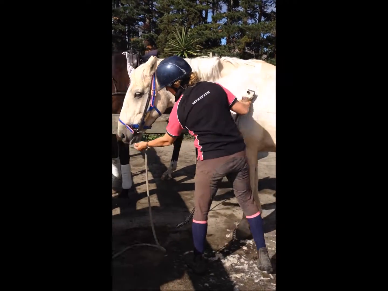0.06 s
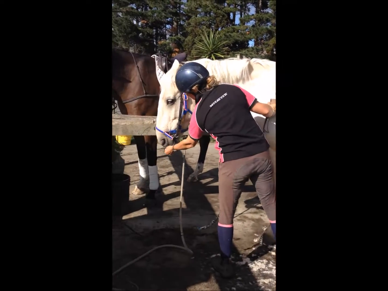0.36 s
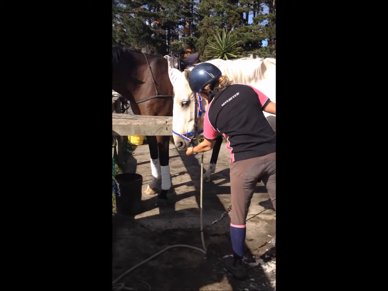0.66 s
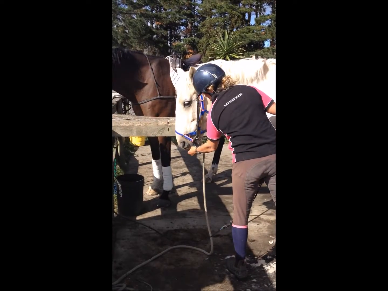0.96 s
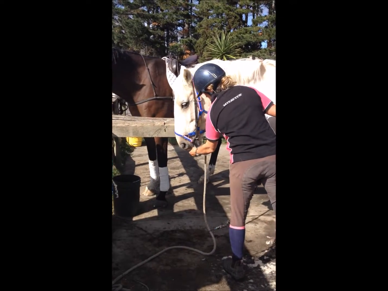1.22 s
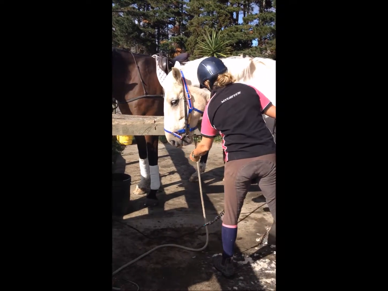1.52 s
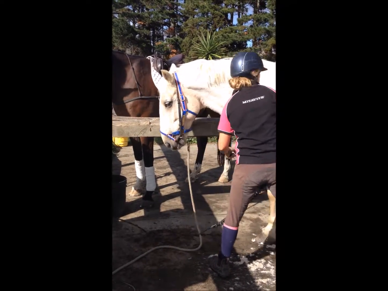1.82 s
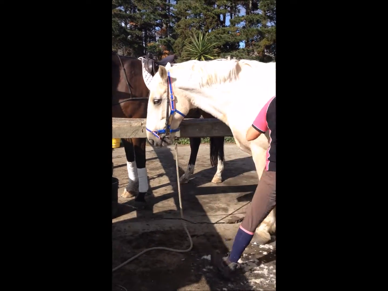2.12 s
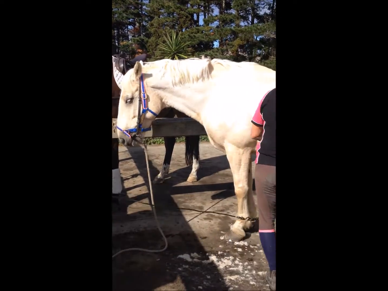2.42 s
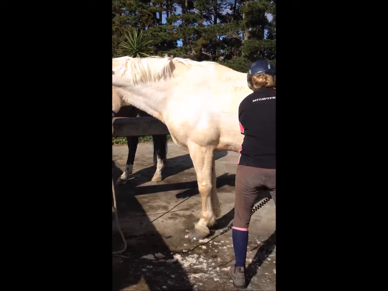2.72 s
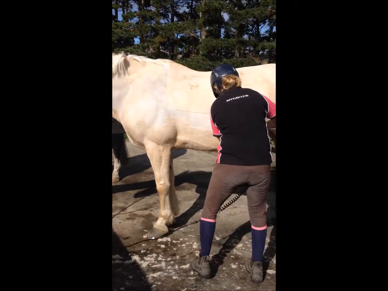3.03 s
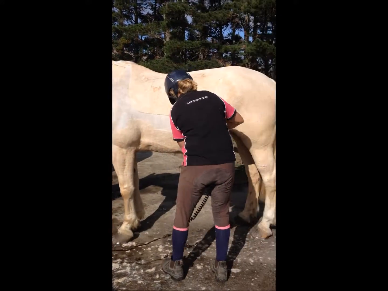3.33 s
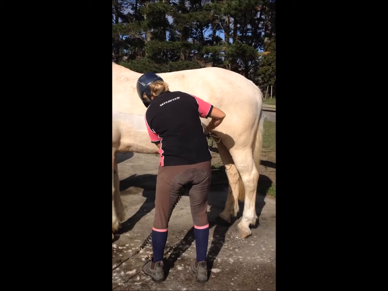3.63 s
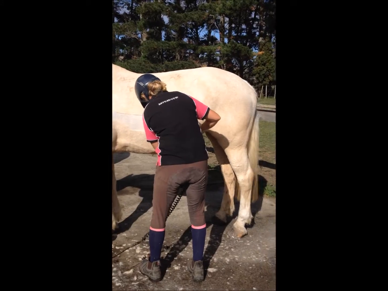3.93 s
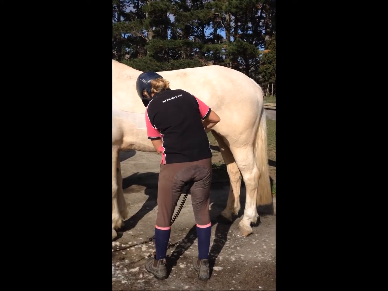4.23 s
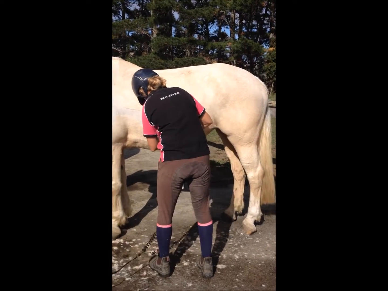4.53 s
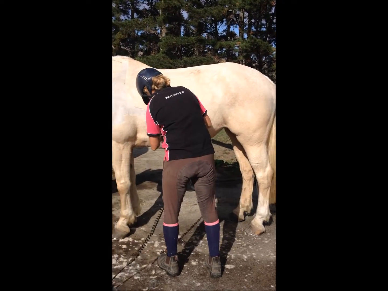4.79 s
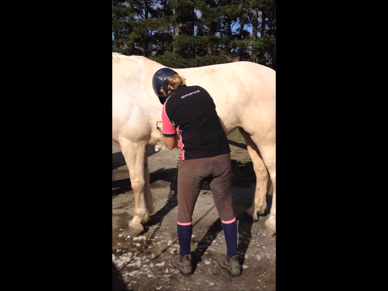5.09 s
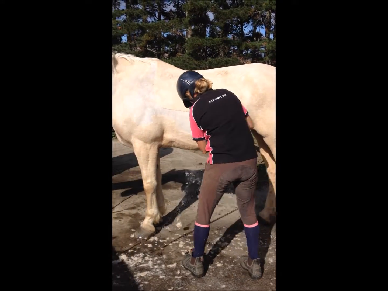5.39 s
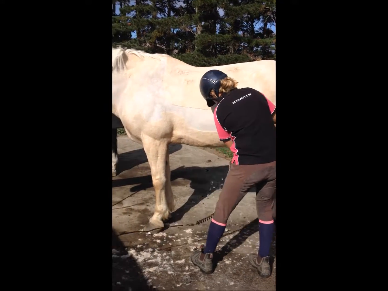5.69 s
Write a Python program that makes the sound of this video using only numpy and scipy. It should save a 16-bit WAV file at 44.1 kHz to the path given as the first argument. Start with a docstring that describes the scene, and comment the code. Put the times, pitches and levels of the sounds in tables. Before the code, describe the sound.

Electric clippers run throughout, a few steps from the microphone in an open yard, with a fast rattling buzz and low hum. Early on the blade rasps through a horse's coat and catches with small clicks. After two seconds the buzz turns quieter and duller, and feet and hooves thud softly. Near the end the motor sags slightly in pitch, then recovers with brief rasping surges. Faint outdoor air lies underneath.

```python
"""Electric horse clippers buzz in an open yard: a crank throws the blade to and fro, clacking at each end.
Held clear beside the horse's neck, they then move behind the groom to the belly, where the coat slows
the motor. Each stroke through the coat brings up the blade and the rasp of its teeth, with snags, and
surges in thick tufts; now and then the ringing of the gear or case swells briefly.
Feet and hooves thud softly over a low bed of outdoor air."""
import sys
import numpy as np
from scipy import signal
from scipy.fft import rfft, irfft, next_fast_len
from scipy.io import wavfile
from scipy.ndimage import uniform_filter1d, map_coordinates

SR = 44100
rng = np.random.default_rng(int(sys.argv[2]) if len(sys.argv) > 2 else 0)


def put_to_file(sound):
    """Save the sound as 16-bit audio at rate SR, in the file named by the first command-line argument."""
    columns = np.atleast_2d(sound).T  # one column per channel
    safe = np.clip(columns, -1, 1)
    whole_steps = np.round(safe * 32767)
    wavfile.write(sys.argv[1], SR, whole_steps.astype(np.int16))


N = 253575


def amp(db):
    """Decibels to gain."""
    return 10 ** (np.asarray(db) / 20)


def steady(x):
    """Ride the gain to hold rms 1 over about every fifth of a second."""
    power = uniform_filter1d(uniform_filter1d(x * x, size=SR // 8), size=SR // 8)
    return x / np.sqrt(np.abs(power) + 1e-20)


def automation(points):
    """Straight ramps through (t/s, value) points, one value per sample."""
    return np.interp(np.arange(N) / SR, *np.transpose(points))


def held(start, end, fade_s):
    """A gate open from start to end, each fade centred on its edge."""
    t = np.arange(N) / SR
    return np.clip(np.minimum(t - start, end - t) / fade_s + .5, 0, 1)


def wobble(per_s, count=4000):
    """Smooth random modulation with per_s knots a second."""
    knots = rng.standard_normal(int(N * per_s / SR) + 4)
    at = np.linspace(0, N, count)
    return np.interp(np.arange(N), at, map_coordinates(knots, [at * per_s / SR]))


def eq(x, points):
    """Minimum-phase EQ through (f/Hz, level/dB) points."""
    size = 2 * next_fast_len(N // 2 + 8192)
    hz, db = np.transpose(points)
    gain = amp(np.interp(np.log(np.fft.rfftfreq(size, 1 / SR) + 1), np.log(hz), db))
    cepstrum = irfft(np.log(np.maximum(gain, 1e-6)))
    cepstrum[1:size // 2] *= 2  # folding the cepstrum makes the filter causal
    cepstrum[size // 2 + 1:] = 0
    return irfft(rfft(x, size) * np.exp(rfft(cepstrum)), size)[:N]


def resonate(x, hz, width_hz):
    """A resonant band whose centre may sweep, levelled to rms 1."""
    carrier = np.exp(2j * np.pi * np.cumsum(hz) / SR)
    narrow = signal.butter(2, width_hz / 2, fs=SR, output="sos")
    return steady((signal.sosfilt(narrow, x / carrier) * carrier).real)


def impulses(times, sizes):
    """Clicks at times that may fall between samples."""
    at = np.clip(times * SR, 0, N)
    whole, part = at.astype(int), at % 1
    before = np.bincount(whole, sizes * (1 - part), N + 2)
    after = np.bincount(whole + 1, sizes * part, N + 2)
    return (before + after)[:N]


# Crank speed: t/s, speed/(turns per s)
CRANK_SPEED = [(0.0, 35.49), (0.7, 35.53), (1.7, 35.42), (2.1, 35.62), (2.35, 35.28), (2.6, 35.68),
               (2.85, 35.29), (3.1, 35.48), (3.4, 35.23), (3.65, 35.22), (3.9, 35.36), (4.1, 34.44),
               (4.35, 33.99), (4.6, 33.51), (4.85, 33.45), (5.1, 34.76), (5.35, 35.11), (5.75, 35.49)]
def load(free_hz=35.4, loaded_hz=33.5):
    """How hard the coat drags on the motor, 0-1, read from the sag in speed."""
    return np.clip((free_hz - automation(CRANK_SPEED)) / (free_hz - loaded_hz), 0, 1)


def crank(flutter_turns=.001, load_flutter_turns=.002):
    """The crank's running count of turns; it flutters, more so under load."""
    flutter = (flutter_turns + load_flutter_turns * load()) * wobble(per_s=9)
    return np.cumsum(automation(CRANK_SPEED)) / SR + flutter


def contacts(turns, jitter_s, scatter_db, rebound_db, back_db=-3, lag_turns=.118, first_turn=.245):
    """Forward and back click trains: the blade hits its stop and rebounds, softer on the way back."""
    stops = np.arange(int(2 * turns[-1]) - 1) / 2 + first_turn
    chance = rng.standard_normal((len(stops), 4))
    t = np.arange(N) / SR
    hit_s = np.interp(stops, turns, t) + jitter_s * chance[:, 0]
    rebound_s = np.interp(stops + lag_turns, turns, t) + 2 * jitter_s * chance[:, 1]
    hit_gain = amp(scatter_db * chance[:, 2])
    rebound_gain = np.sqrt(hit_gain) * amp(rebound_db + scatter_db * chance[:, 3])
    return [impulses(hit_s[side::2], hit_gain[side::2])
            + amp(side * back_db) * impulses(rebound_s[side::2], rebound_gain[side::2])
            for side in (0, 1)]


def decay(t60, yard_db, attack_s, yard_t60=0.25):
    """Envelope of one hit: the part's own ring, then a weak tail off horse, ground and rails."""
    t = np.arange(SR // 10) / SR
    attack = 1 - np.exp(-(t / attack_s) ** 2)
    return attack * np.hypot(amp(-60 * t / t60), amp(yard_db - 60 * t / yard_t60))


def buzz(sides, envelope, timbres=15):
    """Each direction rings alike turn after turn, crossfading to new timbres as the hand moves."""
    out = np.zeros(N + len(envelope))
    place = np.linspace(0, timbres - 1, N)
    for k in range(timbres):
        start, end = np.searchsorted(place, [k - 1, k + 1])
        crossfade = np.sqrt(np.clip(1 - np.abs(place[start:end] - k), 0, 1))
        for hits in sides:
            response = envelope * rng.standard_normal(len(envelope))
            rung = signal.fftconvolve(hits[start:end] * crossfade, response)
            out[start:start + len(rung)] += rung
    return steady(out[:N])


def rasp(sides, envelope):
    """Every hit triggers a fresh burst of noise."""
    power = signal.oaconvolve(sum(sides) ** 2, envelope ** 2)[:N]
    return steady(np.sqrt(np.abs(power)) * rng.standard_normal(N))


def rattle(sides, envelope, rasp_db):
    """Pitched buzz layered with noisy rasp from the same hits."""
    return buzz(sides, envelope) + amp(rasp_db) * rasp(sides, envelope)


# How much of the sound comes from behind the groom: t/s, share/0-1
HIDDEN_SHARE = [(0, 0.14), (1.7, 0.12), (1.92, 0.56), (2.6, 0.36), (3.0, 0.82), (5.75, 0.58)]
def perspective(clear, hidden):
    """Equal-power crossfade between the clippers held clear and hidden behind the groom."""
    share = automation(HIDDEN_SHARE)
    return steady(np.sqrt(1 - share) * steady(clear) + np.sqrt(share) * steady(hidden))


# Resonances held clear, behind the groom and under load: f/Hz, width/Hz, level/dB re the clatter
RINGS_CLEAR = [(1648, 138, -3.5), (2093, 200, -8.5), (2307, 50, -12), (4440, 420, -11.5), (5210, 86, -16),
               (5740, 86, -15.5)]
RINGS_HIDDEN = [(733, 174, -5.5), (1910, 80, -3.5), (2695, 80, -4.5), (6160, 125, -14)]
RINGS_LOADED = [(600, 16, -12), (820, 110, -25), (3010, 160, -11), (3880, 430, -9)]
# Brief swells of ringing in the gear or case: start/s, end/s, strength/0-1, f/Hz
RING_SWELLS = [(-.1, 0.08, 0.57, 2080), (0.53, 0.996, 0.19, 2100), (1.375, 1.46, 0.4, 1780),
               (1.76, 2.1, 0.27, 927), (1.852, 2.446, 0.27, 1040), (2, 2.367, 0.38, 1820),
               (2.784, 3.396, 0.83, 1858)]
# Strokes through the coat: start/s, end/s, pressure/0-1, case f/Hz, blade f/Hz
COAT_STROKES = [(0.162, 1.03, 0.11, 2380, 4360), (1.0, 1.742, 0.14, 2550, 4340),
                (2.31, 2.787, 0.32, 2870, 4670), (4.214, 4.938, 0.24, 2600, 4000),
                (4.923, 5.547, 0.13, 2700, 4000)]
# Thick tufts that make the blade surge: start/s, end/s, strength/0-1, f/Hz
TUFTS = [(4.907, 4.99, 0.5, 4100), (5.012, 5.104, 0.6, 4200), (5.17, 5.44, 0.21, 3800),
         (5.305, 5.35, 0.76, 4130)]
# The steel sings one note: start/s, end/s, level/dB re the clatter, first f/Hz, last f/Hz, width/Hz
WHINES = [(-.1, .34, -6, 1705, 1705, 45), (.28, .52, -5, 2335, 2325, 55), (.7, 1.02, -9, 2330, 2335, 60),
          (1.2, 1.52, -7.5, 1680, 1770, 60), (4.38, 4.98, -1, 4480, 4570, 125)]
SWELL_FADE_S, PRESS_FADE_S, TUFT_FADE_S = 0.1, 0.26, 0.012
def ringing(strikes, low_hz, high_hz, swell_db=8, bite_db=10.5, tuft_db=7, bite_delay_s=0.19):
    """One part's resonances, low_hz to high_hz, brought up by position, load, coat and brief swells."""
    hidden = automation(HIDDEN_SHARE)
    states = [(RINGS_CLEAR, 1 - hidden), (RINGS_HIDDEN, hidden), (RINGS_LOADED, load())]
    modes = [(hz, width, amp(db) * share) for table, share in states for hz, width, db in table]
    swell_width_hz, bite_width_hz, tuft_width_hz = 160, 270, 420
    for start, end, strength, hz in RING_SWELLS:
        modes.append((hz, swell_width_hz, amp(swell_db) * strength * held(start, end, SWELL_FADE_S)))
    for start, end, pressure, *pitches in COAT_STROKES:
        bite = amp(bite_db) * pressure * held(start + bite_delay_s, end, PRESS_FADE_S)
        modes += [(hz, bite_width_hz, bite) for hz in pitches]
    for start, end, strength, hz in TUFTS:
        modes.append((hz, tuft_width_hz, amp(tuft_db) * strength * held(start, end, TUFT_FADE_S)))
    tuning = 1 + .009 * wobble(per_s=7)  # the moving hand detunes the modes
    out = np.zeros(N)
    for start, end, db, first_hz, last_hz, width in WHINES:
        if low_hz <= first_hz < high_hz:
            glide = automation([(start, first_hz), (end, last_hz)])
            out += amp(db) * held(start, end, SWELL_FADE_S) * resonate(strikes, glide, width)
    for hz, width, gain in modes:
        if low_hz <= hz < high_hz:
            out += gain * resonate(strikes, hz * tuning, width)
    return out


# Swings of the clatter as the clippers move, used about their mean: t/s, level/dB
CLATTER_SWINGS = [(0, -30.5), (.25, -30.5), (.65, -28.5), (1.55, -29), (1.87, -34), (2.13, -32),
                  (3.35, -34), (3.6, -36), (4.3, -35.5), (4.85, -33.5), (5.3, -30.5), (5.75, -36)]
def fader(base_db, follows, stroke_db, swell_db, load_db):
    """One part's level in dB: it follows the swings and shifts with pressure, ring swells and load."""
    level = automation(CLATTER_SWINGS)
    pressure, swell = effort(COAT_STROKES, PRESS_FADE_S), effort(RING_SWELLS, SWELL_FADE_S)
    shift_db = stroke_db * pressure + swell_db * swell + load_db * load()
    return base_db + follows * (level - level.mean()) + shift_db


def effort(events, fade_s):
    """Control curve: the summed strength of one kind of event."""
    return sum(strength * held(start, end, fade_s) for start, end, strength, *_ in events)


# Tone of the gear, held clear and behind the groom: f/Hz, level/dB
GEAR_EQ_CLEAR = [(100, -42.5), (170, -11.5), (280, -11.5), (350, -7), (460, -13), (650, -12.5), (810, -9),
                 (950, -11.5), (1100, -3), (1250, -9), (1400, 3.5), (1800, -42)]
GEAR_EQ_HIDDEN = [(120, -37.5), (220, -28), (265, -14), (350, -4), (430, -3.5), (510, -17.5), (610, 1.5),
                  (700, 2), (790, 7), (920, -14.5), (1030, 4), (1200, -5), (1400, 3.5), (1800, -23.5)]
def gear(turns):
    """Low mids: the crank takes up its play with regular knocks, which roughen under load."""
    sides = contacts(turns, jitter_s=.00003, scatter_db=.8, rebound_db=-7)
    knocks = rattle(sides, decay(t60=.016, yard_db=-14, attack_s=.0012), rasp_db=-5.5 + load())
    strikes = rattle(sides, decay(t60=.004, yard_db=-14.5, attack_s=.0004), rasp_db=-3)
    rings = ringing(strikes, low_hz=200, high_hz=1350)
    return steady(perspective(eq(knocks, GEAR_EQ_CLEAR), eq(knocks, GEAR_EQ_HIDDEN)) + rings)


# Tone of the case, held clear and behind the groom: f/Hz, level/dB
CASE_EQ_CLEAR = [(900, -43), (1350, 1), (1550, -18), (2000, 5), (2350, 0.5), (2520, -10.5), (2750, 2),
                 (3150, -14), (4200, -42.5)]
CASE_EQ_HIDDEN = [(900, -57.5), (1300, -12.5), (1480, 5), (1950, 4.5), (2200, -10.5), (2400, 5),
                  (2750, 0.5), (3250, -10.5), (4200, -58.5)]
def case(turns):
    """Mids: the case rings briefly after each hit, wetter with echoes behind the groom."""
    sides = contacts(turns, jitter_s=.00004, scatter_db=.9, rebound_db=0, back_db=-1)
    clear = rattle(sides, decay(t60=.021, yard_db=-19, attack_s=.0014), rasp_db=-3)
    hidden = rattle(sides, decay(t60=.025, yard_db=-13, attack_s=.001), rasp_db=-1.5)
    strikes = rattle(sides, decay(t60=.005, yard_db=-27, attack_s=.0005), rasp_db=-2)
    rings = ringing(strikes, low_hz=1350, high_hz=3200)
    return steady(perspective(eq(clear, CASE_EQ_CLEAR), eq(hidden, CASE_EQ_HIDDEN)) + rings)


# Tone of the blade, held clear and behind the groom: f/Hz, level/dB
BLADE_EQ_CLEAR = [(300, -50), (2200, -15.5), (3150, -10.5), (3600, -2), (4300, -1), (4800, -3.5),
                  (5300, -7.5), (5800, -7), (6200, -43), (8000, -29)]
BLADE_EQ_HIDDEN = [(2200, -37.5), (3100, 5), (3500, 1), (3950, 4), (4500, 2.5), (4950, 3.5), (5700, -0.5),
                   (6200, -29), (8000, -38)]
def blade(turns):
    """Presence: sharp steel clacks, blurred by echoes behind the groom."""
    sides = contacts(turns, jitter_s=.00004, scatter_db=1.5, rebound_db=-2.5)
    sharp = decay(t60=.0052, yard_db=-25, attack_s=.0004)
    blurred = decay(t60=.014, yard_db=-14, attack_s=.001)
    clear = eq(rattle(sides, sharp, rasp_db=-0.5), BLADE_EQ_CLEAR)
    hidden = eq(rattle(sides, blurred, rasp_db=-0.5), BLADE_EQ_HIDDEN)
    rings = ringing(rattle(sides, sharp, rasp_db=-5), low_hz=3200, high_hz=8000)
    return steady(perspective(clear, hidden) + rings)


# Tone of the teeth: f/Hz, level/dB
TEETH_EQ = [(4800, -65), (6000, 3.5), (7200, 0), (8300, -7.5), (9400, -16.5), (12000, -24.5), (15500, -42)]
def teeth(turns):
    """Top end: the teeth rasp, meeting more hair on some throws than on others."""
    bites = contacts(turns, jitter_s=.0001, scatter_db=1.7, rebound_db=-2)
    clear = rasp(bites, decay(t60=.0052, yard_db=-25, attack_s=.0004))
    hidden = rasp(bites, decay(t60=.02, yard_db=-10, attack_s=.0013))
    return steady(eq(perspective(clear, hidden), TEETH_EQ))


def tones(turns, orders, waver_db=0.35):
    """Harmonics locked to the crank, each wavering slightly in level."""
    out = np.zeros(N)
    for order, db in orders:
        gain = np.sqrt(2) * amp(db - waver_db * wobble(per_s=3.82))
        out += gain * np.sin(2 * np.pi * (order * turns + rng.random()))
    return out


# Hum of the body, strongest while held clear: t/s, level/dB
HUM_FADER = [(0, -53.5), (1.5, -53.5), (1.77, -56), (1.88, -66), (3.3, -68), (5.0, -72), (5.75, -68)]
# Rough rumble under the hum: f/Hz, level/dB
RUMBLE_EQ = [(60, -30), (110, -15), (160, -4), (220, -14), (285, 3.5), (335, 2.5), (400, -14), (520, -34)]
# Partials of the hum, of what carries round the groom, and of the groan: f/crank speed, level/dB
HUM_PARTIALS = [(10, 0), (11, -11), (18, -12), (19, -13), (23, -6), (25, -11), (30, -3.5), (32, 1.5),
                (33, -4), (34, -7), (47, -1), (48, 2.5), (59, 2.5), (65, 0)]
HIDDEN_PARTIALS = [(10, -68), (18, -63), (19, -63), (22, -64), (30, -59), (31, -58)]
GROAN_PARTIALS = [(8, -61), (9, -65), (12, -66), (18, -57), (19, -61), (23, -62), (24, -60), (29, -62),
                  (30, -64), (32, -62), (34, -59)]
def hum(turns, rumble_db=-4):
    """The body hums over a rough rumble; load brings out a groan that sags with the speed."""
    rumble = amp(rumble_db) * steady(eq(rng.standard_normal(N), RUMBLE_EQ))
    clear = amp(automation(HUM_FADER)) * (tones(turns, HUM_PARTIALS) + rumble)
    hidden = automation(HIDDEN_SHARE) * (1 - load()) * tones(turns, HIDDEN_PARTIALS)
    groan = np.sqrt(load()) * tones(turns, GROAN_PARTIALS)
    return clear + hidden + groan


# Tone of the open yard: f/Hz, level/dB
AIR_EQ = [(20, -4), (45, -13), (75, -5), (140, 0.5), (280, -2.5), (500, -7), (2000, -6), (15000, -32)]
def air(level_db=-56.0, swell_db=.8):
    """A low, nearly steady bed of outdoor air."""
    return amp(level_db + swell_db * wobble(per_s=5)) * steady(eq(rng.standard_normal(N), AIR_EQ))


# Catches of the blade: t/s, level/dB before trim
SNAGS = [(0.3592, -19), (0.5428, -18), (0.6556, -22), (0.725, -21), (0.8237, -24), (1.149, -16),
         (1.2047, -13), (1.2327, -19), (1.4572, -21), (1.597, -26), (4.4679, -32)]
# Tone of their clack: f/Hz, level/dB
SNAG_EQ = [(800, -35), (2000, -10), (3200, -18), (4400, 8), (5400, -10), (7500, -6), (9500, -17),
           (15000, -22)]
def snags(trim_db=-9.0):
    """Now and then the blade catches and lets go with one harder clack."""
    times, db = np.transpose(SNAGS)
    clack = decay(t60=.009, yard_db=-25, attack_s=.0004)
    power = signal.oaconvolve(impulses(times, amp(db + trim_db) ** 2), clack ** 2)[:N]
    return np.sqrt(np.abs(power)) * steady(eq(rng.standard_normal(N), SNAG_EQ))


# Chirps: start/s, end/s, level/dB, f/Hz
CHIRPS = [(0.374, 0.406, -39, 2330), (0.374, 0.406, -39, 4550), (0.376, 0.407, -47, 7020),
          (3.37, 3.424, -46, 780), (3.386, 3.414, -39, 2140), (3.389, 3.414, -48, 6720),
          (3.657, 3.665, -36, 757), (3.723, 3.78, -52, 754), (3.724, 3.754, -46, 4460),
          (3.73, 3.758, -49, 6250), (4.39, 4.447, -44, 810), (4.652, 4.717, -48, 850),
          (4.766, 4.775, -40, 795)]
def chirps(fade_s=0.0085, waver_hz=9):
    """Short, faint, unsteady sine chirps inside the buzz."""
    waver = waver_hz * wobble(per_s=60)
    out = np.zeros(N)
    for start, end, db, hz in CHIRPS:
        out += amp(db) * held(start, end, fade_s) * np.sin(2 * np.pi * np.cumsum(hz + waver) / SR)
    return out


# Brief thinnings of the sound: centre t/s, length/s, depth/0-1
DIPS = [(0.389, 0.029, .97), (0.441, 0.014, .7), (0.89, 0.014, .7), (0.934, 0.016, .75),
        (1.019, 0.016, .78), (1.337, 0.014, .7), (1.53, 0.014, .7), (1.869, 0.014, .65),
        (1.913, 0.014, .65), (2.764, 0.012, .65), (3.193, 0.014, .7), (3.399, 0.029, .97),
        (3.448, 0.012, .7), (3.664, 0.01, .6), (3.739, 0.028, .95), (4.325, 0.014, .75), (4.41, 0.012, .6),
        (4.687, 0.016, .72), (5.648, 0.014, .65), (5.691, 0.014, .65)]
# Bands that stay through a dip: low f/Hz, high f/Hz
DIP_BANDS = [(1080, 2950), (3850, 5200)]
def thinned(x):
    """Bass and treble duck for an instant, leaving a hollow middle."""
    filters = [signal.butter(5, band, "bandpass", fs=SR, output="sos") for band in DIP_BANDS]
    middle = sum(signal.sosfiltfilt(sos, x) for sos in filters)
    duck = sum(depth * held(s - length / 2, s + length / 2, fade_s=.005) for s, length, depth in DIPS)
    return x - duck * (x - middle)


# Feet and hooves on the ground: t/s, level/dB before trim, f/Hz, t60/s, scuff share/0-1
FOOTFALLS = [(0.549, -36, 175, 0.045, .15), (2.108, -43.5, 137, 0.09, .3), (2.217, -42, 242, 0.05, .7),
             (2.46, -48, 270, 0.22, .95), (2.564, -41.5, 297, 0.098, .05), (2.77, -29, 280, 0.04, .15),
             (2.814, -35.5, 220, 0.047, .15), (5.465, -53, 112, 0.13, .4)]
def footfalls(attack_s=.0046, trim_db=6):
    """Each footfall is a dull, quickly damped thump with a low scuff."""
    t = np.arange(SR // 4) / SR
    attack = 1 - np.exp(-(t / attack_s) ** 2)
    out = np.zeros(N + SR)
    for start, db, hz, t60, share in FOOTFALLS:
        scuff_eq = [(40, -30), (hz / 2, -6), (hz, 0), (2 * hz, -10), (3000, -50)]
        scuff = np.sqrt(share / 2) * steady(eq(rng.standard_normal(N), scuff_eq))[SR:SR + len(t)]
        thump = np.sqrt(1 - share) * np.sin(2 * np.pi * hz * t)
        envelope = attack * amp(db + trim_db - 60 * t / t60)
        out[round(start * SR):][:len(t)] += envelope * (thump + scuff)
    return out[:N]


def scene():
    """The mono mix. One crank drives every part; pressure favours blade and teeth over the case."""
    turns = crank()
    gear_db = fader(base_db=-46.5, follows=0.087, stroke_db=1.5, swell_db=0.1, load_db=0.5)
    case_db = fader(base_db=-37.5, follows=0.91, stroke_db=-4.2, swell_db=2.5, load_db=-0.5)
    blade_db = fader(base_db=-38.5, follows=0.87, stroke_db=5.5, swell_db=-1.4, load_db=1.2)
    teeth_db = fader(base_db=-48.0, follows=0.69, stroke_db=12.0, swell_db=-1.0, load_db=-4.5)
    body = amp(gear_db) * gear(turns) + amp(case_db) * case(turns) + hum(turns)
    blade_db += 1.5 * effort(TUFTS, TUFT_FADE_S)  # surges in thick tufts
    teeth_db += 1.45 * wobble(per_s=12)  # the treble rasp wavers slightly in level, at random
    steel = amp(blade_db) * blade(turns) + amp(teeth_db) * teeth(turns) + snags()
    return (thinned(body + steel + air()) + footfalls() + chirps())[None]


def record(dry, bass_hz=65, top_hz=15600):
    """Master EQ: roll off the deep bass and cut everything above top_hz."""
    low_cut = signal.sosfilt(signal.butter(3, bass_hz, "highpass", fs=SR, output="sos"), dry)
    size = next_fast_len(N + 8192)
    passband = np.fft.rfftfreq(size, 1 / SR) < top_hz
    return irfft(rfft(low_cut, size) * passband, size)[..., :N]


dry = scene()
out = record(dry)
put_to_file(out)
```